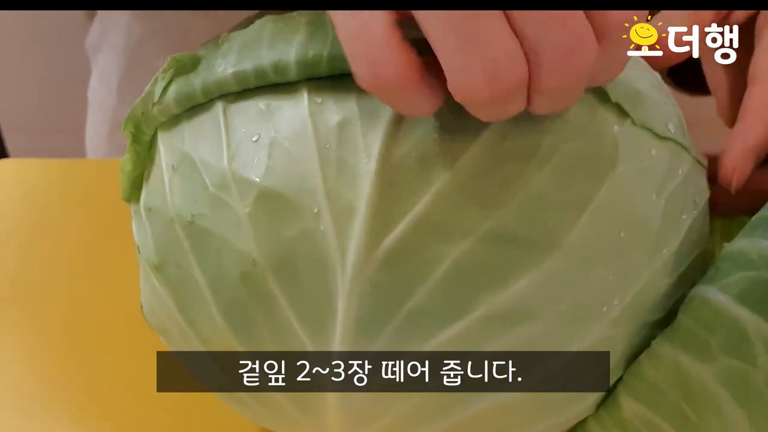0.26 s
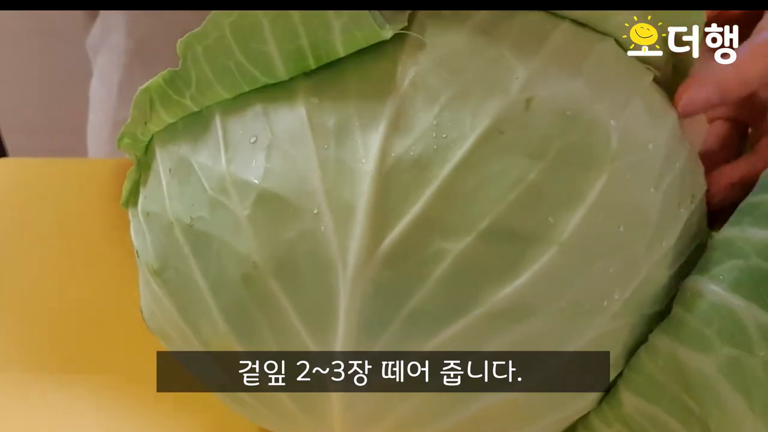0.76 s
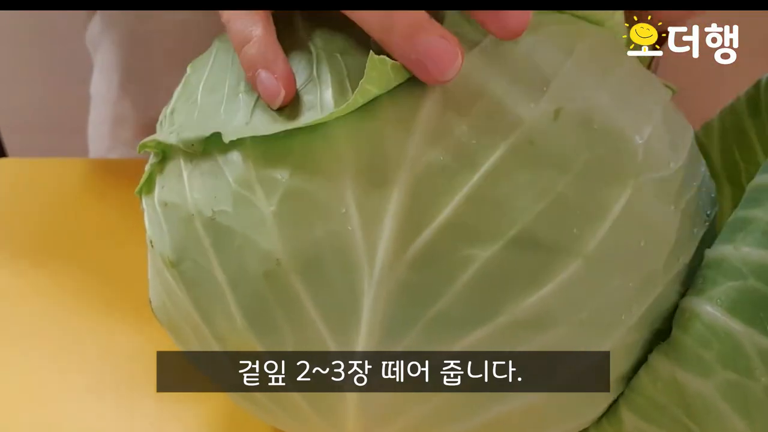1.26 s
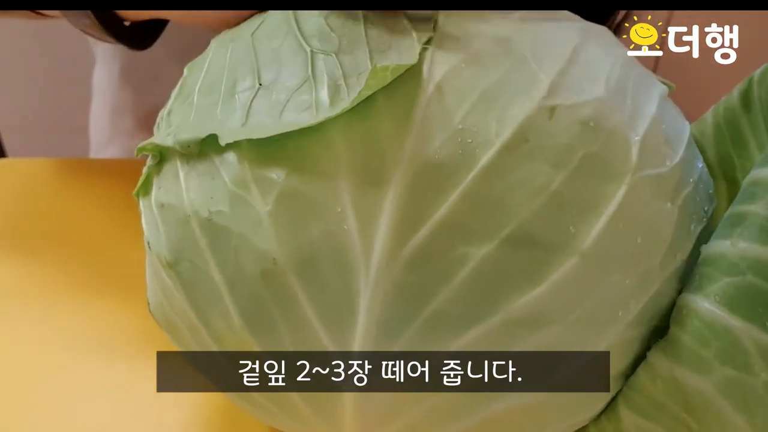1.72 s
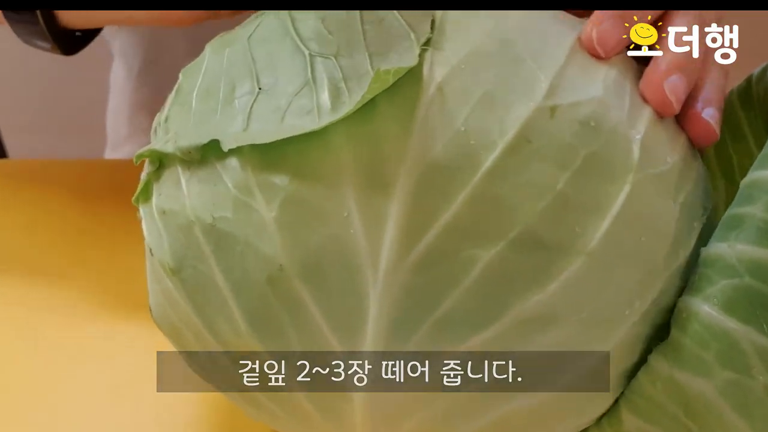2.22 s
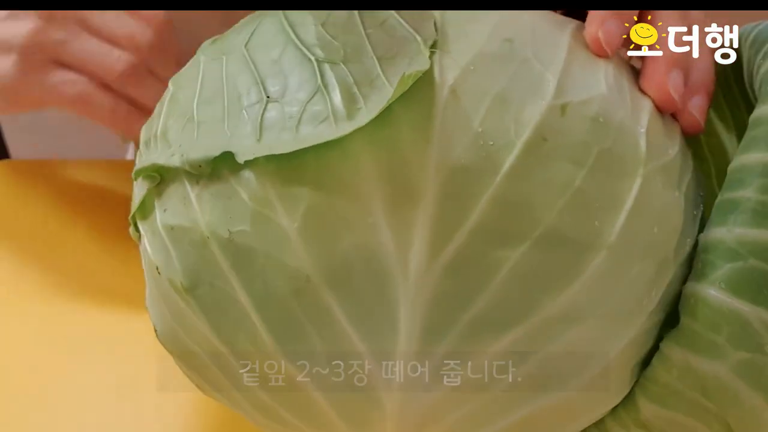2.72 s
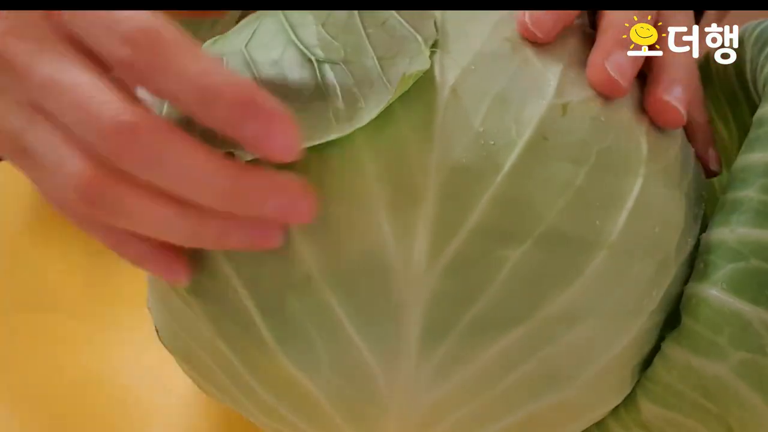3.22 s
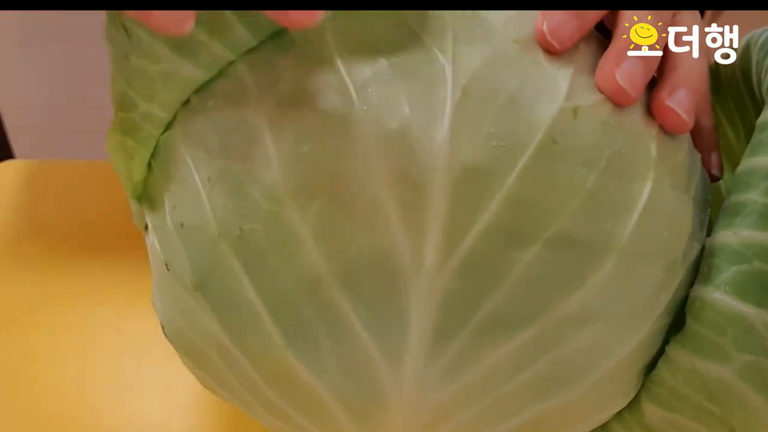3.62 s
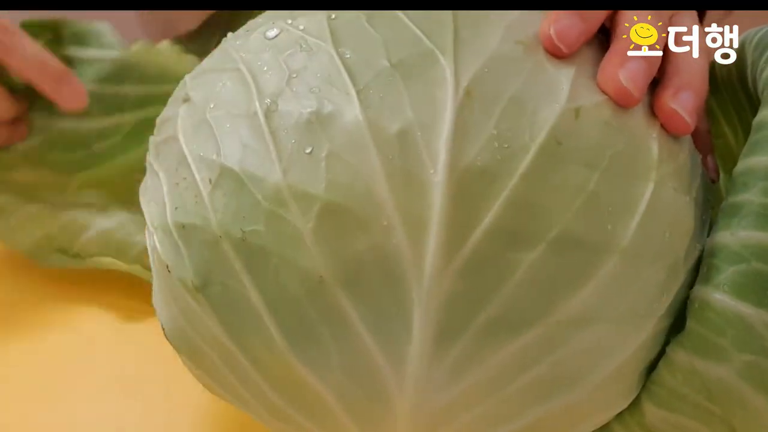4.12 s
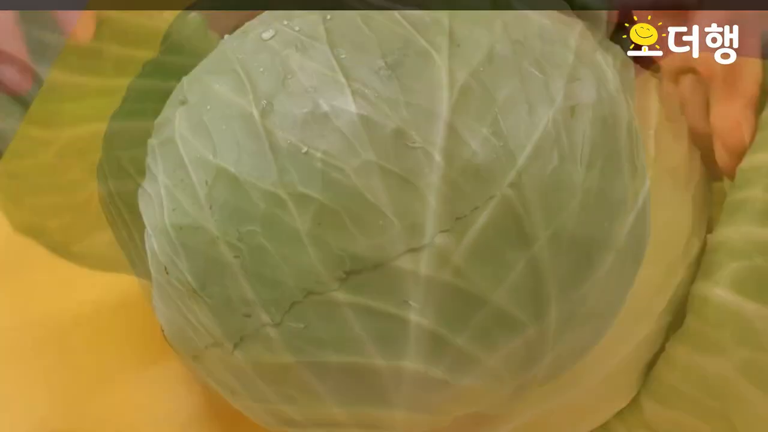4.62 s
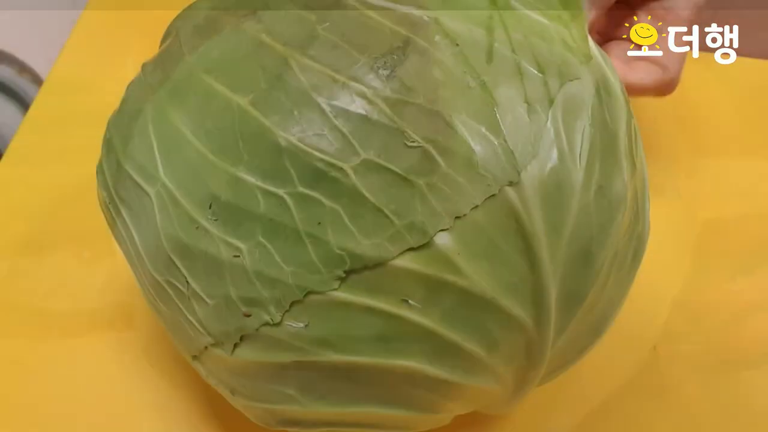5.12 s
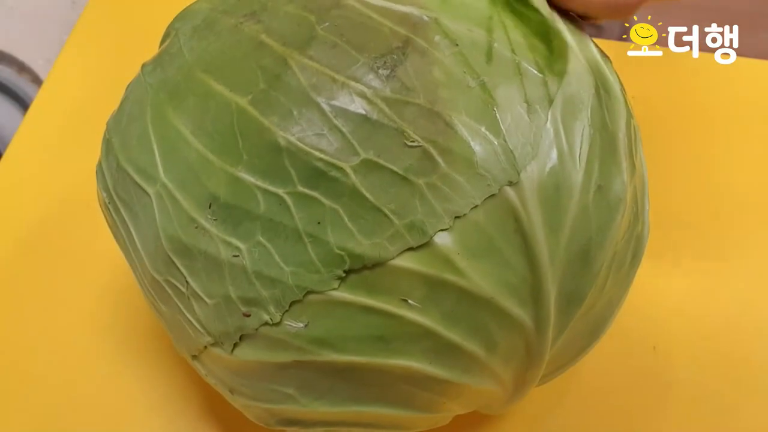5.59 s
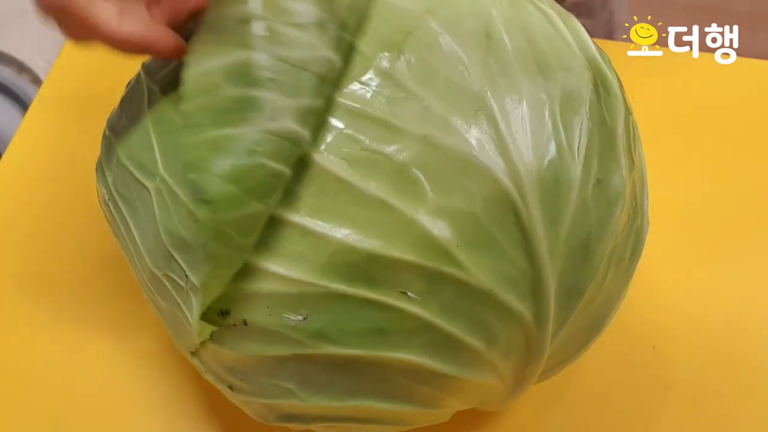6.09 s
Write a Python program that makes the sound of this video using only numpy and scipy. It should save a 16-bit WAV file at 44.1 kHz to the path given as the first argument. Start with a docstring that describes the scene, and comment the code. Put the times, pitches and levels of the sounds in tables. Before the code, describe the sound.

In a small, quiet kitchen, a fresh cabbage is peeled close to the microphones. Faint crackles and light rubbing open the sound, then a crisp burst of snapping ribs comes at about 0.5 s and thins out by 0.7 s. From 1.1 to 1.8 s, uneven pops and crackling tears return in clumps. Between 2.0 and 2.5 s the pull grows strongest: dense crunching, a short hollow creak of a bending rib and a soft low bump of the head on the board. A few weaker snaps follow near 2.8 s, then near silence. Tearing resumes at 3.6 s, with loud, dull-edged crunches at 3.74 and 4.1 s, the latter with low thumps. After 4.4 s it falls away to faint ticks, a small crackle at 5.1 s, and soft waxy rustling from 5.7 s to the end. Short room reflections follow each snap.

```python
"""Peeling a cabbage

Outer leaves are peeled off a fresh cabbage on a cutting board in a small, quiet kitchen.
Ribs and veins snap: a noise crack, a decaying flap ring and a low thud each. Random grains make the
dull flexing, the crackle of tearing cells and the waxy rubbing; slips in a hollow make a creak.
The head bumps on the board in a few damped modes. All but bumps and room tone get a noise-tail echo."""
import sys
import numpy as np
from scipy import signal
from scipy.fft import rfft, irfft
from scipy.io import wavfile
from scipy.ndimage import uniform_filter1d

SR = 44100
rng = np.random.default_rng(int(sys.argv[2]) if len(sys.argv) > 2 else 0)


def file_out(sig):
    """Save sig as 16-bit WAV at sys.argv[1]."""
    # one column per channel
    cols = np.atleast_2d(sig).T
    # limit, then scale
    lim = np.clip(cols, -1, 1)
    pcm = np.round(lim * 32767).astype(np.int16)
    wavfile.write(sys.argv[1], SR, pcm)


N = 280035
TIME_S = np.arange(N) / SR
CUTOFF_HZ = 16100
LEFT_RIGHT = np.array([[1], [-1]])


def from_db(db):
    """Decibels to gain."""
    return 10 ** (np.asarray(db) / 20)


def rms_one(x):
    """Scale to an rms of 1."""
    return x / np.sqrt(np.mean(x ** 2) + 1e-20)


def at_hz(points, hz):
    """Read a table on a log-frequency axis."""
    f, value = np.transpose(points)
    return np.interp(np.log(hz), np.log(f), value)


def band(x, low_hz, high_hz, order=2):
    """Causal Butterworth band-pass."""
    edges_hz = [low_hz, min(high_hz, .45 * SR)]
    return signal.sosfilt(signal.butter(order, edges_hz, "band", fs=SR, output="sos"), x + 1e-18)


def colour(x, spectrum):
    """Minimum-phase filter with the given spectrum, so nothing sounds early."""
    size = 2048
    hz = np.maximum(np.fft.rfftfreq(size, 1 / SR), 1)
    cepstrum = irfft(np.log(from_db(at_hz(spectrum, hz))))
    # fold onto positive time
    cepstrum[1:size // 2] *= 2
    cepstrum[size // 2 + 1:] = 0
    impulse = irfft(np.exp(rfft(cepstrum)))
    return signal.oaconvolve(x, impulse[None], axes=1)[:, :x.shape[1]]


# likeness of the direct sound at the two microphones: f/Hz, likeness/(0-1)
MIC_LIKENESS = [(60, 0.1), (300, .85), (700, 0.9), (1500, 0.19), (4000, 0), (12000, 0.11)]


def stereo(pair, hz):
    """Mix two unrelated signals to left and right, as alike as they are at this pitch."""
    alike = np.clip(at_hz(MIC_LIKENESS, hz), 0, 1)
    return np.sqrt(1 + alike) * pair[0] + np.sqrt(1 - alike) * pair[1] * LEFT_RIGHT


def drift(rate_hz):
    """Slow chance with an rms of 1: straight lines between randomly timed knots."""
    knots_s = np.cumsum(rng.exponential(1, 8000)) / rate_hz
    return rms_one(np.interp(TIME_S, knots_s, rng.standard_normal(len(knots_s))))


def add(out, s, sound):
    """Mix a sound in at its time."""
    start = max(round(s * SR), 0)
    out[:, start:start + sound.shape[1]] += sound[:, :max(N - start, 0)]


def grains(per_s, spread_db, clump_db, smooth_db, grain_s, hz):
    """Clumps of tiny bursts, mostly weak and a few strong, over smooth friction."""
    born = rng.random(N) < per_s / SR
    sizes_db = spread_db * np.minimum(rng.exponential(1, N), 3) + clump_db * drift(70)
    impacts = born * from_db(sizes_db) ** 2 + 1e-12
    power = signal.lfilter([1], [1, -np.exp(-2 / (grain_s * SR))], impacts)
    # the hand's pull sets the mean power, however the fibres share it
    power /= uniform_filter1d(power, size=3500) + 1e-9
    return stereo(rng.standard_normal((2, N)), hz) * np.sqrt(power + from_db(smooth_db) ** 2)


# room tone spectrum: f/Hz, level/dB
ROOM_TONE_SPECTRUM = [(25, -3), (60, 9.5), (150, -0.5), (260, 4), (400, -13), (800, -10), (3000, -25.5),
                      (6500, -16), (16000, -27)]
ROOM_TONE_DB = -72


def room_tone():
    """Steady noise, coloured as the quiet kitchen."""
    noise = stereo(rng.standard_normal((2, N)), 1000)
    tone = from_db(ROOM_TONE_DB) * rms_one(colour(noise, ROOM_TONE_SPECTRUM))
    return band(tone, 29, 19000)


# head bumping and rocking on the board: t/s, level/dB, lift of higher modes/(dB/octave)
HEAD_BUMPS = [(0.0, -58.5, -2), (0.508, -50, -1), (1.081, -55.5, -14), (1.982, -45.5, -8.5),
              (2.255, -38, -8.5), (2.492, -53, -2), (2.68, -53.5, -2), (3.12, -66.5, 1.5),
              (3.389, -55.5, 9), (3.734, -46.5, -6), (3.911, -60, -8), (4.087, -44, 20), (4.435, -61, -7),
              (5.135, -66, 17), (5.661, -65, 17.5), (6.2, -61, 19.5)]
# head-on-board modes: ratio to bump pitch, level re bump/dB, t60/s
HEAD_MODES = [(1, 7, 0.48), (1.25, 1.5, 0.4), (1.8, -7, 0.2), (2.7, -16.5, 0.15)]
BUMP_HZ, BUMP_SPREAD_OCTAVES = 58.5, 0.062
BUMP_PAN_SPREAD_DB, PUSH_S = 1.7, .016


def bumps():
    """A soft push swells into the low modes of the head on the board."""
    out, t = np.zeros((2, N)), TIME_S[:SR]
    for s, db, lift_db in HEAD_BUMPS:
        hz = BUMP_HZ * 2 ** (BUMP_SPREAD_OCTAVES * rng.standard_normal())
        ring = 0
        for ratio, mode_db, t60_s in HEAD_MODES:
            decay_db = mode_db + lift_db * np.log2(ratio) - 60 * t / t60_s
            ring = ring + from_db(decay_db) * np.sin(2 * np.pi * hz * ratio * t)
        pan_db = rng.normal(0, BUMP_PAN_SPREAD_DB) * LEFT_RIGHT
        add(out, s, from_db(db + pan_db) * ring * (1 - np.exp(-t / PUSH_S)))
    return band(out, 28, 1000)


# ribs and thick veins breaking: t/s, ring level/dB, flap f/Hz, crack level re ring/dB
RIB_SNAPS = [(0.0084, -43, 2650, -2.5), (0.1596, -42.5, 2750, -3), (0.2462, -43, 1255, 0),
             (0.348, -49, 2510, 9.5), (0.492, -19.5, 1900, -6), (0.5253, -23.5, 2450, 1.5),
             (0.55, -28, 3070, -5), (0.5692, -38, 1780, 2), (0.5825, -26, 2270, -5),
             (0.6563, -28, 1370, -4), (0.6872, -31, 1610, -11), (0.863, -43, 688, -8),
             (1.0193, -46.5, 3680, -2), (1.1461, -33, 2180, -4.5), (1.156, -31, 1820, -7),
             (1.1714, -23, 2290, -5.5), (1.2337, -25.5, 2140, -16), (1.2583, -25.5, 2180, -11),
             (1.2737, -21.5, 1630, -9), (1.2833, -28.5, 1950, -14), (1.3309, -33, 1590, -8.5),
             (1.353, -41.5, 1620, -1), (1.3965, -38, 1260, -9), (1.4416, -50.5, 1620, 6.5),
             (1.4698, -22, 1920, -7), (1.5359, -29, 1320, -3.5), (1.5567, -28.5, 1960, -8),
             (1.5657, -43, 2180, 11), (1.612, -42, 2480, 10), (1.6511, -39, 2380, 5.5),
             (1.685, -34, 2100, -1), (1.7034, -36, 2710, -3.5), (1.7519, -27.5, 2200, -14),
             (1.7816, -19.5, 1950, -3), (1.858, -36, 1560, 0), (1.9282, -29, 1216, -10.5),
             (1.952, -32.5, 995, -6.5), (1.9854, -26, 1430, -0.5), (2.0034, -30, 565, -3),
             (2.0463, -43, 830, 3.5), (2.1299, -33.5, 880, -2), (2.214, -26.5, 974, -9),
             (2.2974, -27, 1260, -9), (2.3316, -16, 1840, -6), (2.3865, -19, 1120, -25),
             (2.474, -15.5, 2190, -14), (2.4991, -21.5, 1013, -9), (2.5177, -22, 2170, -29),
             (2.7369, -35, 1150, -5.5), (2.7633, -34, 1270, -20), (2.8114, -35.5, 1246, -11),
             (3.501, -52.5, 3380, 3), (3.5557, -43, 2270, 1), (3.5985, -42, 2000, 11),
             (3.623, -29, 1330, -7), (3.6569, -37, 2100, 3.5), (3.7108, -29, 854, 3),
             (3.7373, -16.5, 1012, -11), (3.8534, -33.5, 954, -15), (3.9214, -46.5, 990, 3),
             (4.064, -31, 1440, -17), (4.0823, -17.5, 1080, -11.5), (4.1242, -20.5, 1350, -16),
             (4.176, -33.5, 1870, -1), (4.2957, -39, 1900, -27), (4.459, -44.5, 538, -11),
             (4.5819, -41.5, 1570, -18), (4.795, -59, 500, -2), (4.888, -47.5, 2740, -2.5),
             (5.1305, -41.5, 1050, 1.5), (6.327, -44.5, 2330, -1)]
# swinging modes of the freed flap: ratio to its pitch, level/dB
FLAP_SWINGS = [(1, -6), (1.78, -13), (2.699, -14.5)]
CRACK_S, CRACK_HZ = .0008, 4300
FLAP_S, FLAP_WIDTH_RATIO, SWING_CYCLES = 0.0027, 1.454, 9.3
THUD_S, THUD_LOW_HZ, THUD_HIGH_HZ = 0.0031, 260, 700
THUD_DB, THUD_DB_PER_OCTAVE = -15.5, -4.0   # re ring, at 1700 Hz
GRIT, SNAP_LEFT_DB, SNAP_PAN_SPREAD_DB = 0.38, 0.5, 1


def snaps():
    """A vein bursts within a millisecond: a bright crack, a few cycles of the freed flap, a thud in the head."""
    out, t = np.zeros((2, N)), TIME_S[:1024]
    release = np.exp(-t * SR / 2)

    def level(x, db):
        """Set the rms over a nominal 5 ms, in each channel."""
        return from_db(db) * x * np.sqrt(.005 * SR / np.sum(x ** 2, axis=1, keepdims=True))

    for s, db, hz, crack_db in RIB_SNAPS + thin_veins():
        cells = rng.standard_normal((3, 2, len(t)))
        crack = band(stereo(cells[0], CRACK_HZ) * np.exp(-t / CRACK_S), CRACK_HZ, CUTOFF_HZ)
        # one sudden release of tension plus a spray of bursting cells
        flap = release + GRIT * stereo(cells[1], hz) * np.exp(-t / FLAP_S)
        flap = band(flap, hz / FLAP_WIDTH_RATIO, hz * FLAP_WIDTH_RATIO, order=1)
        flap = level(band(flap, 530, 5500), 0)
        for ratio, swing_db in FLAP_SWINGS:
            swing = np.sin(2 * np.pi * hz * ratio * t) * np.exp(-t * hz * ratio / SWING_CYCLES)
            flap = flap + from_db(swing_db) * swing
        thud = release + GRIT * stereo(cells[2], THUD_LOW_HZ) * np.exp(-t / THUD_S)
        thud = band(thud, THUD_LOW_HZ, THUD_HIGH_HZ)
        # thick, low-pitched ribs shake the head more
        thud_db = THUD_DB + THUD_DB_PER_OCTAVE * np.log2(hz / 1700)
        snap = level(flap, 0) + level(crack, crack_db) + level(thud, thud_db)
        side_db = SNAP_LEFT_DB + rng.normal(0, SNAP_PAN_SPREAD_DB)
        add(out, s, snap * from_db(db + side_db * LEFT_RIGHT))
    return out


# echo spectrum: f/Hz, level/dB
ECHO_SPECTRUM = [(60, -0.5), (250, -7), (900, -6), (2000, -8), (4000, -5.5), (16000, -3)]
# echo decay: f/Hz, t60/s
ECHO_DECAY = [(100, .35), (1500, 0.43), (5000, 0.28), (16000, 0.2)]
FIRST_ECHO_S, ECHO_BUILD_S, ECHO_DB = .0035, 0.00033, -4.0


def kitchen(x):
    """Echoes from the worktop and near walls build up fast, die sooner in the treble and come from all sides."""
    t, edges_hz = TIME_S[:SR // 2], np.geomspace(50, 18000, 10)
    tail = 0
    for low, high in zip(edges_hz, edges_hz[1:]):
        hz = np.sqrt(low * high)
        # above 600 Hz, take the likeness of a higher pitch
        echoes = stereo(rng.standard_normal((2, len(t))), hz * max(hz / 600, 1))
        tail = tail + band(echoes, low, high) * from_db(-60 * t / at_hz(ECHO_DECAY, hz))
    tail *= 1 - np.exp(-np.maximum(t - FIRST_ECHO_S, 0) / ECHO_BUILD_S)
    tail = colour(tail / np.sqrt(np.sum(tail ** 2) / 2), ECHO_SPECTRUM)
    return from_db(ECHO_DB) * signal.fftconvolve(x, tail, axes=1)[:, :N]


STROKE_DROP_DB, STROKE_SHAPE = 16.5, 1.48   # fall over one swell or fade time; 1 = pointed top, 2 = rounded
GENTLE_DB, HARD_DB = -52, -38   # tearing level of a gentle slide and of a hard pull


def effort_db(since_s, swell_s, fade_s):
    """The hand's effort swells to its peak and fades again."""
    away = np.maximum(-since_s / swell_s, since_s / fade_s)
    return -STROKE_DROP_DB * np.minimum(away, 10) ** STROKE_SHAPE


# pulls or slides of the hand on a leaf:
# peak t/s, swell/s, fade/s, then levels before trim: flexing/dB, tearing/dB, rubbing/dB
HAND_STROKES = [(0.14, 0.065, 0.088, -60.5, -50.5, -57), (0.22, 0.055, .045, -60, -54, -53.5),
                (0.369, 0.041, 0.06, -64, -46.5, -45.5), (0.441, .06, 0.025, -58, -37.5, -37),
                (0.575, 0.093, .032, -37, -33.5, -42), (0.798, .12, 0.16, -53, -48, -61),
                (1.052, .035, 0.08, -65.5, -44, -56), (1.176, 0.026, 0.024, -45, -34, -38),
                (1.279, .035, .09, -69, -37, -44), (1.54, .07, .17, -56.5, -36, -46),
                (1.795, .07, .07, -70.5, -37, -46), (2.0, .08, 0.12, -54.5, -37, -51),
                (2.209, .11, 0.084, -48, -33.5, -37), (2.37, .09, 0.19, -46.5, -27.5, -33.5),
                (2.51, .04, .04, -38, -28.5, -35), (2.76, .07, 0.092, -44, -41.5, -50),
                (3.11, 0.2, 0.13, -67.5, -72, -86.5), (3.248, .025, 0.03, -83, -60.5, -74.5),
                (3.399, .12, 0.061, -60.5, -52.5, -55.5), (3.648, .07, 0.13, -64.5, -35, -39.5),
                (3.742, 0.055, .038, -32.5, -21.5, -29), (3.9, .1, 0.12, -70.5, -59, -71),
                (4.105, .03, 0.086, -30, -30, -36.5), (4.28, .12, 0.19, -48.5, -45.5, -52.5),
                (4.69, .2, .13, -61, -59.5, -67.5), (4.901, 0.058, 0.08, -95, -60, -61.5),
                (5.079, .07, 0.043, -77, -67, -56.5), (5.135, .025, 0.046, -60, -41, -37),
                (5.565, 0.041, 0.1, -88, -68, -81), (5.73, 0.13, 0.21, -78, -62, -57),
                (5.848, 0.049, .22, -86, -53, -54.5), (6.09, 0.19, 0.22, -74, -49.5, -50),
                (6.299, .22, 0.22, -64.5, -52.5, -58)]


def stroke_gains():
    """Flexing, tearing and rubbing share each stroke's envelope; overlapping strokes sum in power."""
    t = TIME_S[::32]
    power = 0
    for s, swell_s, fade_s, *levels_db in HAND_STROKES:
        stroke_db = np.array(levels_db)[:, None] + effort_db(t - s, swell_s, fade_s)
        power = power + from_db(stroke_db) ** 2
    return [np.interp(TIME_S, t, np.sqrt(p)) for p in power]


VEIN_DB, VEIN_SPREAD_DB = -2.5, 2.5   # re the stroke's tearing
VEIN_MAX_DB = -32   # cap on that tearing level: a thin vein holds no more pull
VEIN_GENTLE_LOSS_DB = 1   # veins are weaker in a gentle stroke
VEIN_HZ, VEIN_SPREAD_OCTAVES, VEIN_CRACK_DB = 1890, 0.79, 0
VEIN_SCATTER = .7   # share of the swell and fade times over which they fall


def thin_veins(count=3):
    """A few small snaps at random times in every stroke, following the pull; rows as in RIB_SNAPS."""
    rows = []
    for s, swell_s, fade_s, _, tear_db, _ in HAND_STROKES:
        gentle = np.interp(tear_db, [GENTLE_DB, HARD_DB], [1, 0])
        for when, (size, pitch) in zip(rng.random(count), rng.standard_normal((count, 2))):
            since_s = VEIN_SCATTER * (when * (swell_s + fade_s) - swell_s)
            db = min(tear_db, VEIN_MAX_DB) + effort_db(since_s, swell_s, fade_s) / 2
            db += VEIN_DB + VEIN_SPREAD_DB * size - VEIN_GENTLE_LOSS_DB * gentle
            hz = VEIN_HZ * 2 ** (VEIN_SPREAD_OCTAVES * pitch)
            rows.append((s + since_s, db, hz, VEIN_CRACK_DB))
    return [row for row in rows if 0 < row[0] < TIME_S[-1]]


def folds(x, shift_db=5.5, rate_hz=20):
    """The pockets of a crumpling leaf lift and damp ever different pitches."""
    edges_hz = np.geomspace(500, 6000, 12)
    out = x
    for low, high in zip(edges_hz, edges_hz[1:]):
        out = out + band(x, low, high, order=1) * (from_db(shift_db * drift(rate_hz)) - 1)
    return out


# leaf spectra: f/Hz, level/dB
FLEXING_SPECTRUM = [(30, -27.5), (70, -8.5), (130, -8.5), (240, 0), (420, -5), (600, -1.5), (800, -7.5),
                    (1300, -36.5)]
# f/Hz, level/dB
TEARING_SPECTRUM = [(350, -27.5), (600, -11.5), (780, -3), (1350, -3), (1950, -1.5), (2500, -5),
                    (3600, -4.5), (5000, -14), (9000, -23.5)]
# f/Hz, level/dB
RUBBING_SPECTRUM = [(2000, -88.5), (3500, -12), (5000, -3), (7000, -1.5), (8500, 3), (10000, -1.5),
                    (12300, 2.5), (16000, -6)]
FLEX_TRIM_DB, TEAR_TRIM_DB, RUB_TRIM_DB, LEAF_LEFT_DB = -3.0, -1.0, 0.5, 0.22


def leaf():
    """The blade flexes with dull knocks, its cells tear with a crackle, its waxy skin rasps."""
    flex, tear, rub = stroke_gains()
    knocks = grains(per_s=250, spread_db=3, clump_db=1.5, smooth_db=-4, grain_s=.002, hz=350)
    # a harder pull bursts more cells at once, so loud tearing is denser
    per_s = 900 * np.sqrt(1 + tear / from_db(-50))
    # a gentle slide is mostly smooth friction, a hard pull comes in clumps
    hard = np.interp(20 * np.log10(tear + 1e-9), [GENTLE_DB, HARD_DB], [0, 1])
    cells = grains(per_s=per_s, spread_db=4, clump_db=1 + 2.5 * hard, smooth_db=-3 - 7 * hard,
                   grain_s=.0005, hz=2500)
    out = flex * from_db(FLEX_TRIM_DB) * rms_one(colour(knocks, FLEXING_SPECTRUM))
    out += tear * from_db(TEAR_TRIM_DB) * rms_one(colour(folds(cells), TEARING_SPECTRUM))
    out += rub * from_db(RUB_TRIM_DB) * rms_one(colour(cells, RUBBING_SPECTRUM))
    return out * from_db(LEAF_LEFT_DB * LEFT_RIGHT)


# hollow between leaf and head: f/Hz, width/Hz, level/dB
LEAF_HOLLOW_MODES = [(570, 250, -5), (707, 120, 5), (940, 410, 1.5)]


def hollow(x):
    """The cavity's modes in parallel, with alternating signs."""
    modes = 0
    for k, (hz, width_hz, db) in enumerate(LEAF_HOLLOW_MODES):
        mode = band(x, hz - width_hz / 2, hz + width_hz / 2, order=1)
        modes = modes + (-1) ** k * from_db(db) * mode
    return band(modes, 440, 1000)


CREAK_FROM_S, CREAK_TO_S, CREAK_SWELL_S, CREAK_FADE_S = 2.04, 2.41, 0.053, .12
CREAK_DB, CRACK_COUPLING_DB = -42.5, 2.5


def creak(cracks):
    """While a thick rib is bent back, its uneven slips and its cracks ring in the hollow under the leaf."""
    slips = grains(per_s=150, spread_db=3.0, clump_db=4, smooth_db=-12, grain_s=0.0012, hz=400)
    since_s = TIME_S - np.clip(TIME_S, CREAK_FROM_S, CREAK_TO_S)
    bending = from_db(CREAK_DB + effort_db(since_s, CREAK_SWELL_S, CREAK_FADE_S))
    bent = (TIME_S > CREAK_FROM_S - CREAK_SWELL_S) & (TIME_S < CREAK_TO_S + CREAK_FADE_S)
    return bent * (bending * rms_one(hollow(slips)) + from_db(CRACK_COUPLING_DB) * hollow(cracks))


RIGHT_LAG_S = .00014


def scene():
    """The cabbage close by and a little to the left, the kitchen around it."""
    cracks = snaps()
    left, right = cracks + leaf() + creak(cracks)
    cabbage = np.array([left, np.interp(TIME_S - RIGHT_LAG_S, TIME_S, right)])
    return cabbage + kitchen(cabbage) + bumps() + room_tone()


def record(dry):
    """Steep elliptic low-pass."""
    return signal.sosfilt(signal.ellip(10, .1, 80, CUTOFF_HZ, fs=SR, output="sos"), dry)


dry = scene()
out = record(dry)
file_out(out)
```